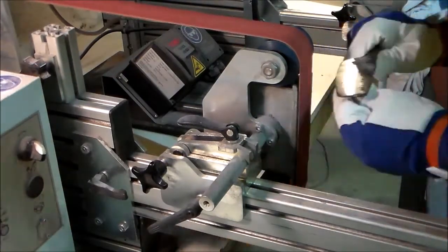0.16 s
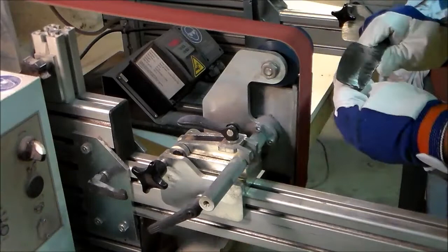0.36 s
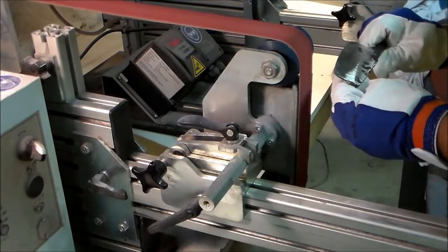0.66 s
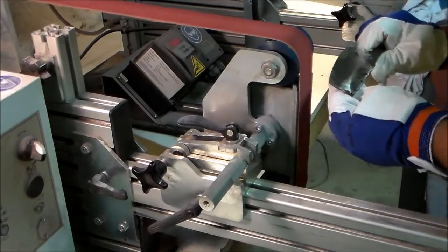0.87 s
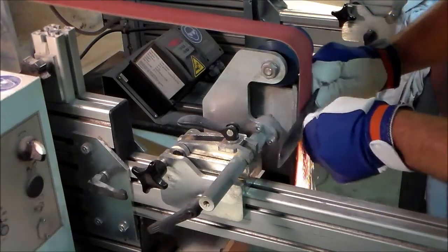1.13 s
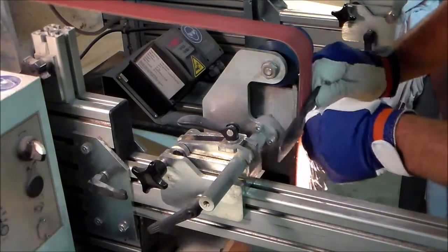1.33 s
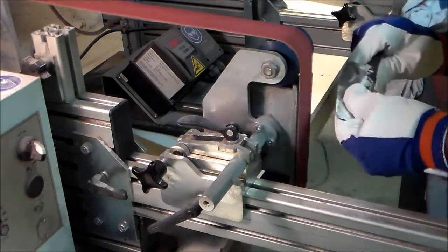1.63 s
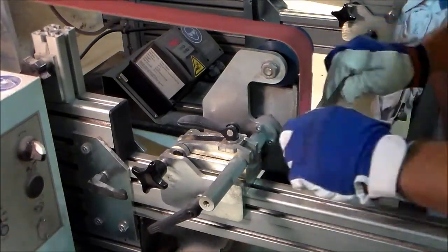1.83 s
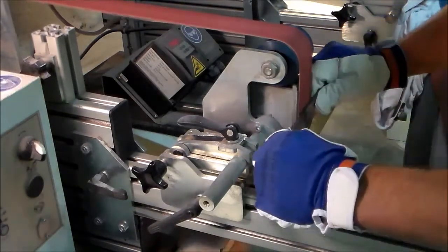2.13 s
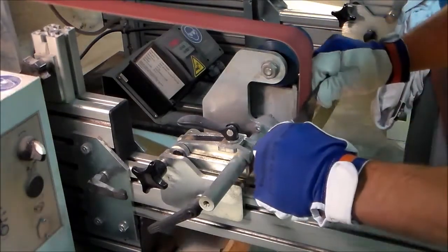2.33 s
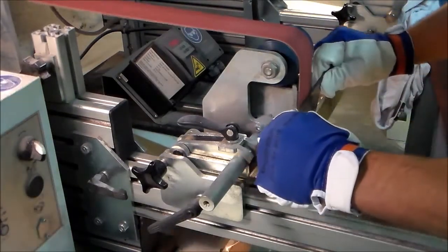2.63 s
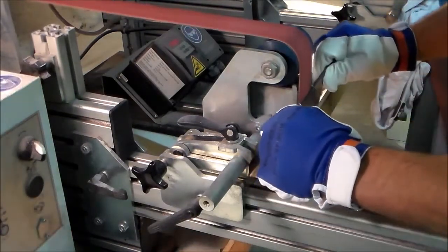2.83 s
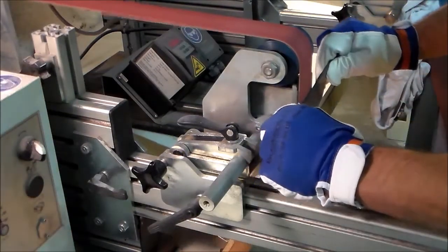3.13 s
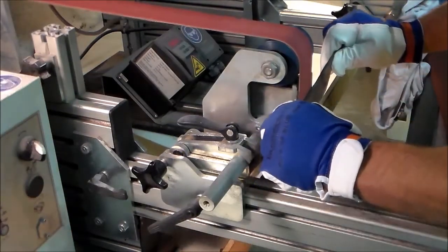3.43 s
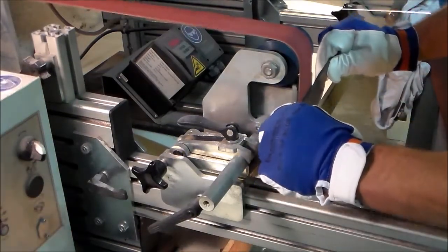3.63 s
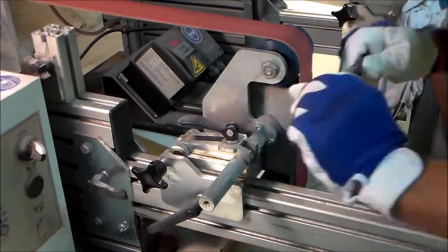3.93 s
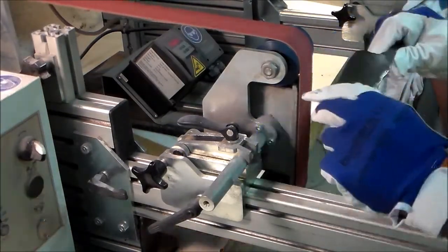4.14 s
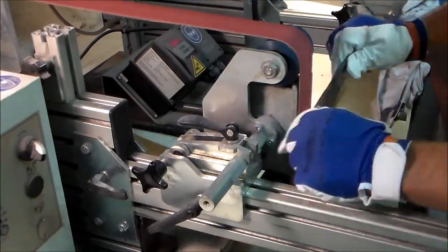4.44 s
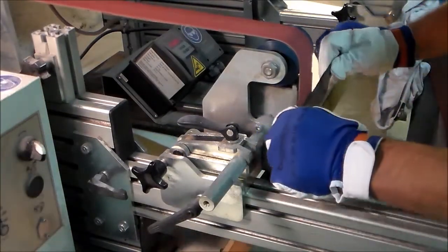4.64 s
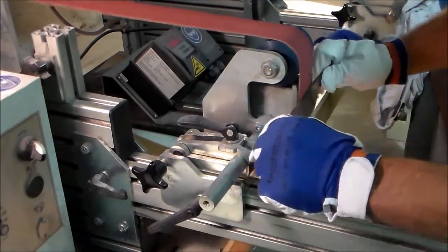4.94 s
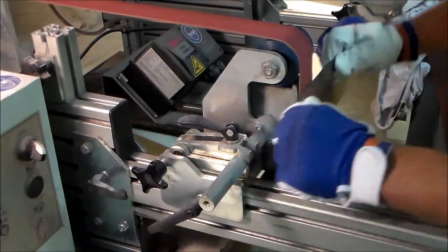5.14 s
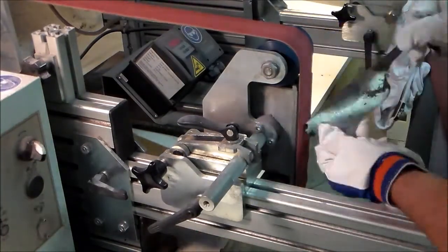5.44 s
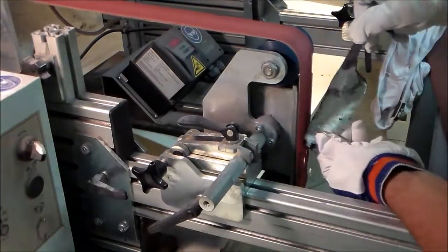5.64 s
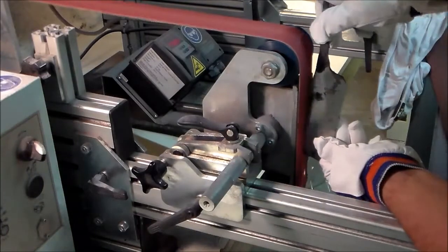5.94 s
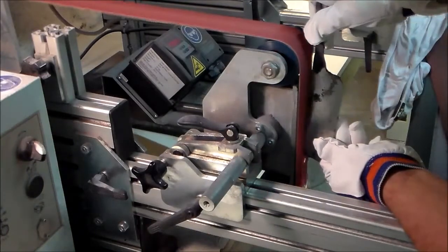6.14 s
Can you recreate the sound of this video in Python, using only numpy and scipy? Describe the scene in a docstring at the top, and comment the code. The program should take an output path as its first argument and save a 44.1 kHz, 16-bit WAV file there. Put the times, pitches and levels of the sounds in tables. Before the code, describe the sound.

A belt grinder hisses and whines steadily close by while a steel blade is pressed on it five times, each pass scraping and ringing harshly.

```python
"""Knife blank on a belt grinder

A belt grinder runs close by in a workshop while a steel knife blank is pressed on the belt five times.
The running belt hisses and sings in a pattern that comes round about 44 times a second, over motor hum.
Shaped noise makes the hiss, sine waves make the hum and whine, and opposed noise a low rumble of air.
Each pass drags the speed down a little; grit strikes the steel and rings blade and platen (the plate
behind the belt), made as noise through resonances that differ with every grip."""
import sys
import numpy as np
from scipy import signal
from scipy.fft import rfft, irfft, next_fast_len
from scipy.io import wavfile

SR = 44100
rng = np.random.default_rng(int(sys.argv[2]) if len(sys.argv) > 2 else 0)


def generate_wav(sig):
    """Save sig (samples, or channels by samples) to the path in sys.argv[1] as 16-bit PCM at SR."""
    pcm = np.round(np.clip(np.atleast_2d(sig).T, -1, 1) * 32767).astype(np.int16)
    wavfile.write(sys.argv[1], SR, pcm)


N = 277388

# low rumble of the air in the shop, as a relative spectrum: pitch_hz, level_db (per Hz)
RUMBLE_SPECTRUM = [(20, 10), (60, 8), (130, 5), (190, 0.5), (260, -16), (500, -33), (1500, -73)]
# sound that differs between left and right: pitch_hz, level_db (against the direct sound)
STEREO_WIDTH = [(150, -25), (400, -37), (600, -42), (900, -70), (2500, -72), (3500, -60), (5500, -31),
                (9000, -14.5), (12000, -24), (14500, -9.5)]
# motor hum before its overall level: pitch_hz, level_db (rms)
HUM_TONES = [(102.3, -71), (183.0, -61.5)]
# tones the running belt sings, before they waver or sink: multiple (of the turning rate), level_db (rms)
SINGING_TONES = [(7, -54.6), (15, -59.5), (17, -58.0), (21, -52.8), (22, -56.6), (27, -61.4), (29, -60.7),
                 (42, -57.1), (74, -62.0), (114, -52.7), (153, -53.2), (163, -57.8), (177, -54.2),
                 (182, -56.6), (189, -56.2), (195, -54.6), (251, -51.4), (259, -50.2), (269, -53.3),
                 (270, -53.4), (283, -51.7), (289, -49.1), (293, -52.1), (308, -46.2), (309, -41.7),
                 (328, -43.7), (329, -46.1), (339, -45.3)]
# hiss of the running belt, as a relative spectrum: pitch_hz, level_db (per Hz)
BELT_HISS_SPECTRUM = [(130, -31), (220, -25.5), (300, -8.5), (500, -19), (700, -13), (1200, -15),
                      (2200, -23.5), (2800, -18), (4200, -14.5), (7000, -12), (12500, -7), (14000, 4),
                      (15700, -1.5)]
# resonances of frame and wheels: pitch_hz, width_hz, lift_db
FRAME_RESONANCES = [(284, 9.2, 5), (398, 37, 5.5), (895, 130, 5), (1611, 250, 11.5), (2236, 420, 18.5),
                    (2987, 19, 12.5), (3328, 27, 18.5), (3694, 40, 12), (3750, 19, 2), (4665, 37, 10.5),
                    (5040, 71, 12.5), (6800, 9.1, 18.5), (9420, 85, 7), (10540, 860, 4.5)]
# part of the belt's power that repeats on every turn: pitch_hz, share (0-1)
BELT_REPEAT_SHARE = [(200, 0.33), (800, 0.15), (2000, 0.56), (5000, 0.37), (10000, 0), (14000, 0)]
# the blade is on the belt:
# touch_s, lift_off_s, drag_hz (final slow-down), machine_change_db (final), seating_s (time to settle)
PASSES = [(-0.3, 0.145, 0.53, -4.5, 0.03), (1.145, 1.53, 0.45, -4, 0.036),
          (1.986, 3.941, 0.46, -5.5, 0.036), (4.565, 5.175, 0.45, -5, 0.024),
          (5.496, 6.494, 0.32, -3, 0.19)]
# the hand pushes harder for a moment: middle_s, length_s, platen_lift_db, bending_lift_db
PUSHES = [(0.03, 0.14, 1.5, 2.5), (1.197, 0.087, 14, 7), (2.142, 0.16, 7, 8), (3.13, 0.37, -0.5, 2),
          (3.708, 0.17, 2, 6), (4.82, 0.15, -4.5, 5), (5.18, 0.08, 10.5, 1), (5.971, 0.15, 1.5, 2),
          (6.28, 0.12, 2.5, 3)]
# grit cutting steel, as a relative spectrum: pitch_hz, level_db (per Hz)
SCRAPE_SPECTRUM = [(500, -60), (900, -23.5), (1150, -31.5), (1800, -13), (2800, -7.5), (4200, -11.5),
                   (5500, -3.5), (8000, 4.5), (11000, 8), (14500, 3), (15700, 12.5)]
# strong and weak harmonics of the grit's repeating pattern: multiple (of the turning rate), level_db (relative)
GRIT_MARKS = [(18, -2.8), (19, -3.1), (21, 1.8), (22, 2.4), (30, -3.8), (31, 2.2), (32, -4.6), (40, -3.6),
              (41, 3.7), (44, 3.7), (45, -3.8), (48, 2.7), (55, -4.1), (57, -4.8), (60, 4.3), (61, 3.9),
              (62, 3.8), (65, -6.8), (66, -5.6), (72, 5.0), (89, 5.4), (91, 3.6), (98, 4.8), (102, 4),
              (106, 5.3), (111, 4.2), (114, 4.4), (129, 4)]
# part of the grit's power that repeats on every turn, before firmness: pitch_hz, share (0-1)
GRIT_REPEAT_SHARE = [(900, .94), (2000, .87), (5000, .75), (10000, .55), (14000, .42)]
# resonances of blade and platen as held in each pass: pitch_hz, width_hz, lift_db
GRIP_1 = [(706, 135.9, 15), (960, 67, 17), (1273, 59.7, 15), (1840, 1800, 23), (2134.8, 42.5, 16)]
GRIP_2 = [(640, 52.7, 15), (744.6, 35.0, 10.0), (980, 150, 11), (1450, 780, 20.5), (2150, 74, 17.6),
          (3730, 227.4, 9.1), (4730, 220, 14.6), (5660, 71, 5)]
GRIP_3_START = [(471.2, 45.0, 8.8), (745, 65, 13.4), (949.4, 82, 19.5), (1257, 69, 22.8), (1547, 210, 19.3),
                (1873, 46, 19), (2150, 170, 14), (3280, 130, 3.9), (3750, 41, 8.6), (4467, 40, 13.6),
                (11700, 310, 7)]
GRIP_3_MIDDLE = [(614.1, 86.8, 18), (774, 33, 14), (957, 126, 24), (1196, 310, 24), (1530, 30, 17.7),
                 (1812, 290, 16), (2143, 120, 15), (5650, 160, 5.8), (10260, 86, 7.9), (11900, 93, 13)]
GRIP_3_END = [(953, 54, 17), (1265, 129.1, 14.4), (1441, 1400, 5.8), (1528, 42, 17.6), (1850, 211.3, 10.5),
              (2170, 63, 10), (2360, 38, 13), (3810, 50.6, 7.4), (5600, 130, 4.3)]
GRIP_4_START = [(471.4, 45.0, 16.0), (629, 111.0, 9.4), (940.5, 53, 26), (1250, 81, 18), (1520, 42, 22),
                (1900, 920.0, 19), (5690, 110, 13)]
GRIP_4_END = [(471.9, 45.0, 11.3), (614.7, 45.0, 9.2), (939, 120, 23), (1200, 940, 25.4), (1270, 48, 9.2),
              (1880, 79, 8.9), (2240, 270, 7.3), (3300, 60, 9), (4600, 1100, 9.5)]
GRIP_5 = [(471.2, 45.0, 16), (604, 88.4, 29), (750, 100, 13), (975, 49, 18), (1180, 340, 17.3),
          (1710, 33, 5), (1856, 45, 19.7), (2220, 270, 18.4), (4990, 210, 11.5), (6890, 270, 5.5),
          (9600, 170, 5.4)]
GRIP_5_END = [(620, 120, 31), (960, 83, 9.5), (1260, 86, 15), (1540, 200, 14), (1880, 76, 13),
              (2260, 690, 12), (5000, 200, 5.6), (5700, 180, 4.3)]
# the blade is moved to a new hold; levels are rms before pushes and uneven bite:
# middle_of_slide_s, firmness (factor on the repeating share), platen_db, bending_db, high_ring_db, hiss_db, grip
HOLDS = [(-0.3, 1.0, -51, -41.5, -41.5, -37.5, GRIP_1), (0.8, 0.81, -58, -45, -41, -37.5, GRIP_2),
         (1.8, 1.01, -47, -48, -44, -38.5, GRIP_3_START), (2.6, 1.1, -46.5, -47, -43, -35.8, GRIP_3_START),
         (2.88, 1.02, -49.5, -42.5, -43.5, -36.5, GRIP_3_MIDDLE),
         (3.25, 1.06, -48.5, -42.5, -40, -35, GRIP_3_MIDDLE),
         (3.56, 0.92, -46, -43.5, -42.5, -36, GRIP_3_END), (4.3, 0.96, -46, -47, -40.5, -37, GRIP_4_START),
         (4.91, 0.92, -46.5, -43, -42, -36.5, GRIP_4_END), (5.35, 0.67, -47, -36, -40.5, -32.5, GRIP_5),
         (6.09, 0.68, -47, -38.5, -41.5, -35, GRIP_5_END)]
# where platen, bending, high ring and hiss hand over: pitch_hz
REGISTER_EDGES_HZ = [1226, 2940, 5920]

IDLE_HZ = 44.25   # turns per second with no blade on the belt
SLOW_DOWN_S, SPIN_UP_S = 0.075, 0.07   # the drive takes the load and is freed
SINK_S, RECOVER_S = 0.015, 0.044   # the machine's sound sinks and comes back
CUT_IN_S, LIFT_OFF_S = 0.072, 0.032   # the grit starts and stops cutting
HISS_FOLLOWS = 0.3   # share of the platen's lift in dB that reaches the grit hiss
FIRST_BITE_DB, FIRST_BITE_S = 6, 0.13   # extra hiss as the steel meets the belt, and its fade
SLIDE_S = 0.22   # time to slide from one hold to the next
CUTOFF_HZ = 15800   # top of the treble

TIME = np.arange(N) / SR
SIZE = next_fast_len(N)
FREQS = np.maximum(np.arange(SIZE // 2 + 1) * SR / SIZE, 1)


def from_db(db):
    """Turn decibels into gain."""
    return 10 ** (np.asarray(db) / 20)


def rms_one(x):
    """Scale a sound to an average power of 1."""
    return x / np.sqrt(np.mean(x ** 2) + 1e-20)


def over_hz(points):
    """Join a table's points by straight lines over log frequency."""
    hz, value = np.transpose(points)
    return np.interp(np.log(FREQS), np.log(hz), value)


def filtered(x, gain):
    """Apply one gain per frequency."""
    return irfft(rfft(x, SIZE) * gain, SIZE)[..., :N]


def below(hz, order):
    """Gain of a low-pass filter; a higher order cuts more steeply."""
    return 1 / np.sqrt(1 + (FREQS / hz) ** (2 * order))


def body(spectrum, resonances):
    """Gain of a broad spectrum lifted where the metal resonates."""
    lift_db = sum(db / (1 + (2 * (FREQS - hz) / width) ** 2) for hz, width, db in resonances)
    return from_db(over_hz(spectrum) + lift_db) * below(CUTOFF_HZ, order=60)


def drift(rate_hz):
    """Slow random wander of spread 1, made at one fortieth of the sample rate."""
    pole = np.exp(-2 * np.pi * rate_hz * 40 / SR)
    noise = rng.standard_normal(N // 40 + 2002)
    slow = signal.lfilter([1], [1, -2 * pole, pole * pole], noise)[2000:]   # skip the filter's start
    return np.interp(np.arange(N) / 40, np.arange(len(slow)), rms_one(slow))


def surface(turns, count, uneven_db, marks=(), size=8192):
    """A random rough profile, built from harmonics, that passes once a turn."""
    fine = np.minimum(np.arange(count) / 80, 1)   # fine detail is the most uneven
    heights_db = uneven_db * rng.standard_normal(count) * fine
    for multiple, db in marks:
        heights_db[int(multiple)] = db
    heights = from_db(heights_db) * np.exp(2j * np.pi * rng.random(count))
    heights = heights * (np.arange(count) >= 2)   # no once-a-turn part
    profile = rms_one(irfft(heights, size))
    return np.interp(turns % 1 * size, np.arange(size), profile)


def rubbing(repeating, fresh, repeat_share):
    """Friction force: partly the same on every turn, partly new."""
    share = np.clip(repeat_share, 0, 1)
    return filtered(repeating, np.sqrt(share)) + filtered(fresh, np.sqrt(1 - share))


def contact(touch_s, lift_s, attack_s, release_s):
    """Settles towards 1 after the blade touches, holds, and falls to 0 after it lifts."""
    settled = 1 - np.exp(-np.maximum(TIME - touch_s, 0) / attack_s)
    return settled * np.clip(1 - (TIME - lift_s) / release_s, 0, 1)


def rumble(level_db):
    """Moving air: low noise, mostly opposite in left and right."""
    mid, side = filtered(rng.standard_normal((2, N)), from_db(over_hz(RUMBLE_SPECTRUM)))
    opposite = rms_one(side) * np.array([[1], [-1]])
    return from_db(level_db) * (opposite + from_db(-13.0) * rms_one(mid))


def shop(direct, size=1500):
    """Early echoes from the machine's metalwork reach left and right with opposite sign."""
    echoes = rng.standard_normal(size) * np.hanning(2 * size)[size:]   # fading noise
    echoed = signal.fftconvolve(direct, echoes / np.linalg.norm(echoes))[:N]
    side = filtered(echoed, from_db(over_hz(STEREO_WIDTH)))
    return np.array([direct + side, direct - side])


def speed():
    """Turns per second: each pass drags the drive down, and it spins up again when freed."""
    drags = [drag * contact(touch, lift, SLOW_DOWN_S, SPIN_UP_S) for touch, lift, drag, _, _ in PASSES]
    return IDLE_HZ - sum(drags)


def sinking_db():
    """The machine's own sound sinks while the blade is on."""
    return sum(db * contact(touch, lift, SINK_S, RECOVER_S) for touch, lift, _, db, _ in PASSES)


def motor(level_db, waver_db):
    """The motor hums on steady pitches at a slightly wavering level."""
    tones = 0
    for hz, db in HUM_TONES:
        tones = tones + from_db(db) * np.sqrt(2) * np.sin(2 * np.pi * (hz * TIME + rng.random()))
    return tones * from_db(level_db + waver_db * drift(17))


def whine(turns, multiple, db, waver_db, wander):
    """A tone on a multiple of the turning rate, unsteady in level and phase (wander in radians)."""
    phase = 2 * np.pi * (multiple * turns + rng.random()) + wander * drift(6.5)
    return from_db(db + waver_db * drift(14)) * np.sqrt(2) * np.sin(phase)


def singing(turns, level_db):
    """The running belt sings on multiples of the turning rate as it scrapes over the platen."""
    return sum(whine(turns, multiple, db + level_db, waver_db=1.2, wander=.2)
               for multiple, db in SINGING_TONES)


def belt(turns, level_db, flutter_db):
    """The belt rubs over wheels and platen, harder at several places of each turn."""
    rough = surface(turns, count=370, uneven_db=4.0)
    force = rubbing(rough, rng.standard_normal(N), over_hz(BELT_REPEAT_SHARE))
    hiss = rms_one(filtered(force, body(BELT_HISS_SPECTRUM, FRAME_RESONANCES)))
    drone = filtered(hiss, below(4000, order=4))   # the heavy frame does not follow the flutter
    slap = from_db(flutter_db * surface(turns, count=11, uneven_db=0))
    return from_db(level_db) * rms_one(drone + slap * (hiss - drone))


def grains(per_s, spread_db):
    """Single grits strike at random, a few of them hard."""
    sizes = from_db(spread_db * np.minimum(rng.exponential(1, N), 4)) * rng.choice([-1, 1], N)
    return rms_one(sizes * (rng.random(N) < per_s / SR))


def pushes_db():
    """Lift of the four registers: pushes swell and fade; the hiss gets its extra lift at each touch."""
    platen = bending = 0
    for middle, length, platen_db, bending_db in PUSHES:
        swell = np.exp(-(2 * (TIME - middle) / length) ** 2)
        platen = platen + platen_db * swell
        bending = bending + bending_db * swell
    first_bite = sum((TIME > touch) * np.exp(-np.abs(TIME - touch) / FIRST_BITE_S) for touch, *_ in PASSES)
    hiss = FIRST_BITE_DB * first_bite + HISS_FOLLOWS * platen
    return np.array([platen, bending, 0 * bending, hiss])   # the high ring gets no lift


def held_blade(grit):
    """Grit drives platen and blade; levels and resonances change as the contact slides between holds."""
    lows = [below(hz, order=12) ** 2 for hz in REGISTER_EDGES_HZ]
    # four neighbouring bands whose powers add up to 1
    registers = np.sqrt(np.abs(np.diff([0 * FREQS, *lows, 1 + 0 * FREQS], axis=0)))
    slides = [np.clip((TIME - hold[0]) / SLIDE_S + .5, 0, 1) for hold in HOLDS[1:]]
    reached = [1] + slides + [0]
    strikes = grains(per_s=16000, spread_db=2.0)
    out = 0
    for k, (_, firmness, *levels_db, grip) in enumerate(HOLDS):
        # a firm hold repeats more exactly
        force = rubbing(grit, strikes, firmness * over_hz(GRIT_REPEAT_SHARE))
        rings = filtered(force, registers * body(SCRAPE_SPECTRUM, grip))
        levelled = np.array([from_db(db) * rms_one(ring) for db, ring in zip(levels_db, rings)])
        out = out + (reached[k] - reached[k + 1]) * levelled
    return out


def grinding(turns, judder, bite_db):
    """Steel rings as it is seated and grit hisses as it cuts in; the blade judders (in turns), bites unevenly."""
    grit = surface(turns + judder * drift(4.1), count=370, uneven_db=3.0, marks=GRIT_MARKS)
    seated = sum(contact(touch, lift, seating_s, LIFT_OFF_S) for touch, lift, _, _, seating_s in PASSES)
    cutting = sum(contact(touch, lift, CUT_IN_S, LIFT_OFF_S) for touch, lift, _, _, _ in PASSES)
    # platen, bending, high ring, hiss
    gains = np.array([seated, seated, seated, cutting]) * from_db(pushes_db() + bite_db * drift(23))
    return np.sum(gains * held_blade(grit), axis=0)


def scene():
    """Machine and blade share one turning rate; echoes and rumble surround them."""
    turns = np.cumsum(speed()) / SR
    machine = belt(turns, level_db=-29.5, flutter_db=1.64)
    machine = machine + singing(turns, level_db=0.0) + motor(level_db=1.4, waver_db=1.5)
    direct = from_db(sinking_db()) * machine + grinding(turns, judder=0.00022, bite_db=0.82)
    direct = filtered(direct, np.sqrt(1 - below(100, order=3) ** 2))   # small parts radiate little bass
    return shop(direct) + rumble(level_db=-58.0)


def record(dry):
    """Cut the top of the treble steeply."""
    return filtered(dry, below(CUTOFF_HZ, order=250))


dry = scene()
out = record(dry)
generate_wav(out)
```